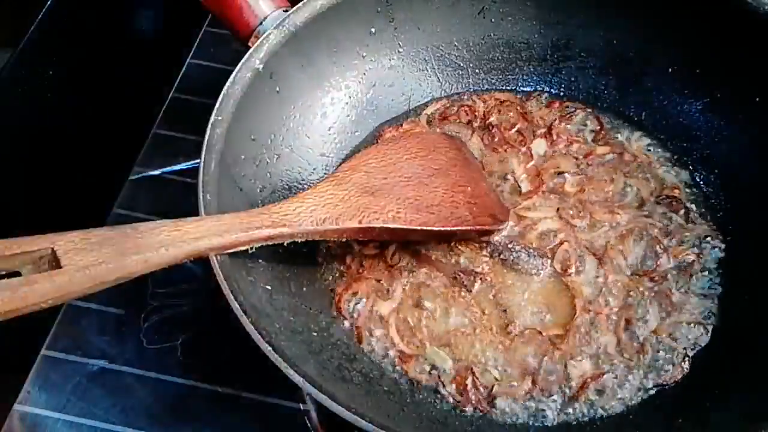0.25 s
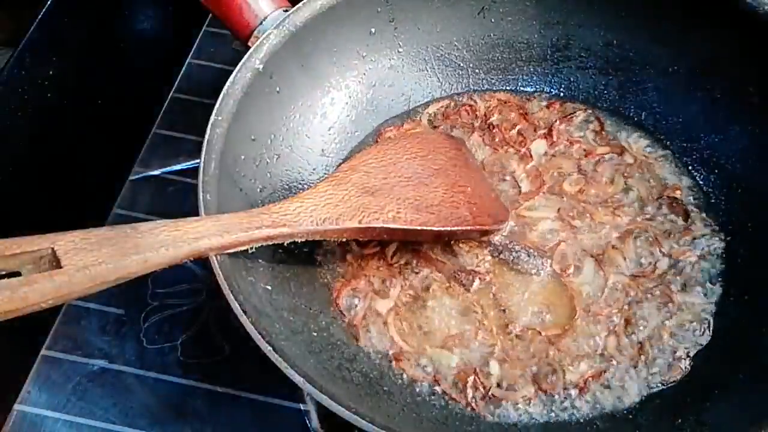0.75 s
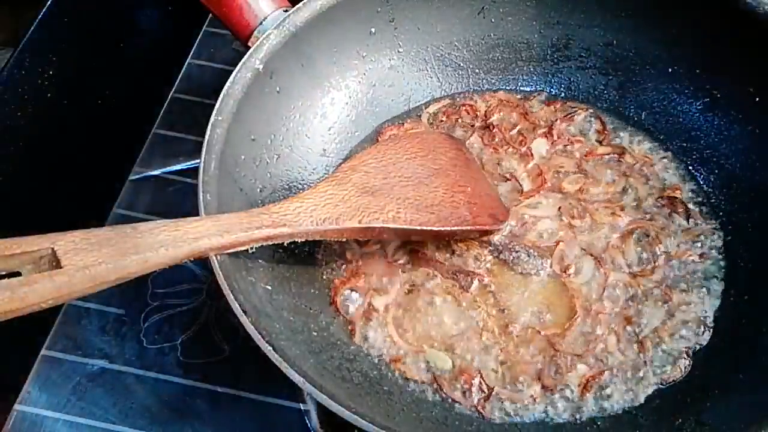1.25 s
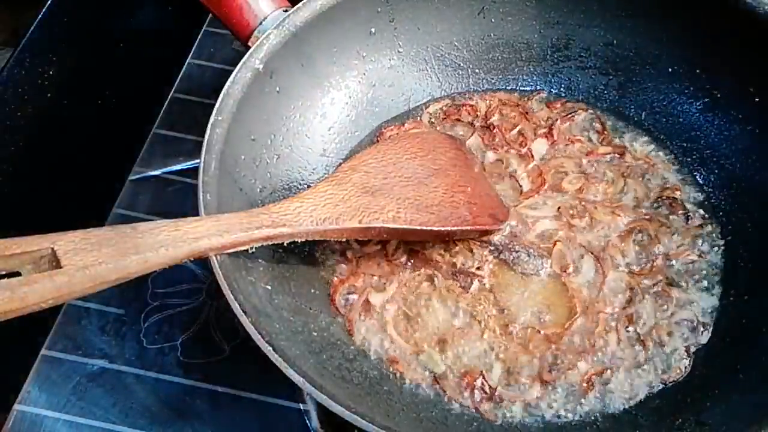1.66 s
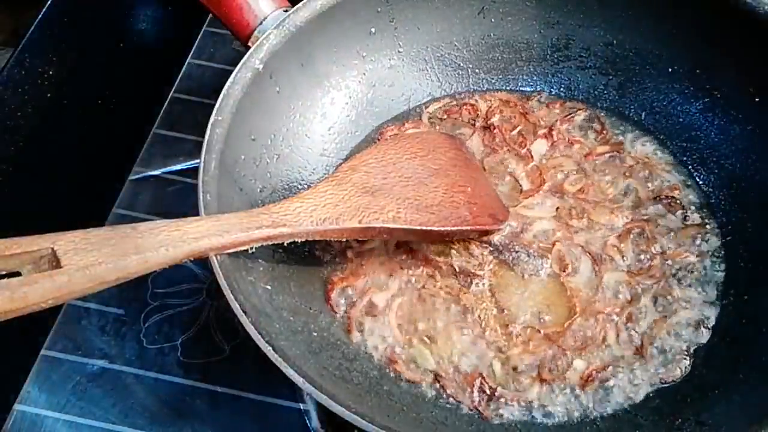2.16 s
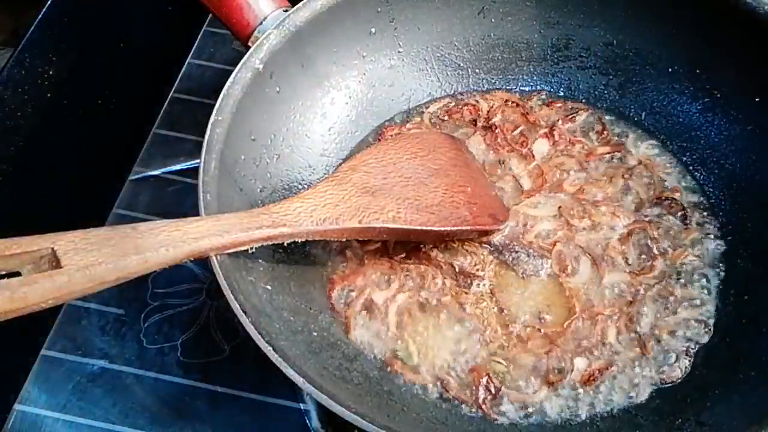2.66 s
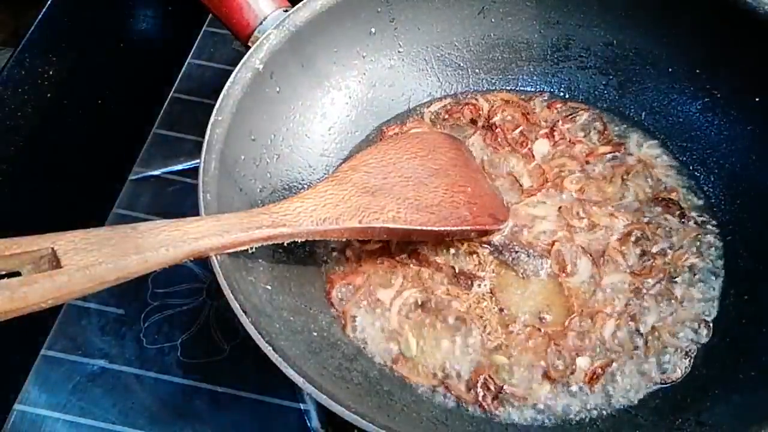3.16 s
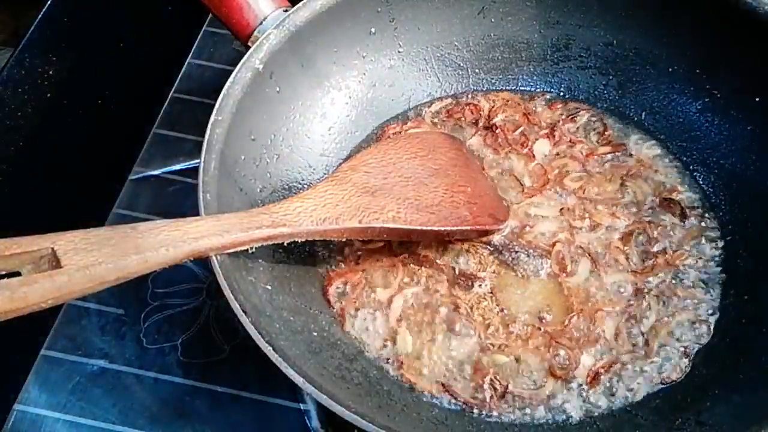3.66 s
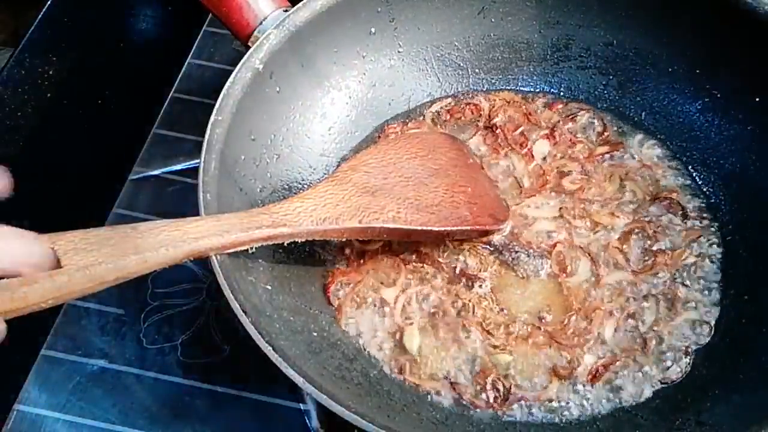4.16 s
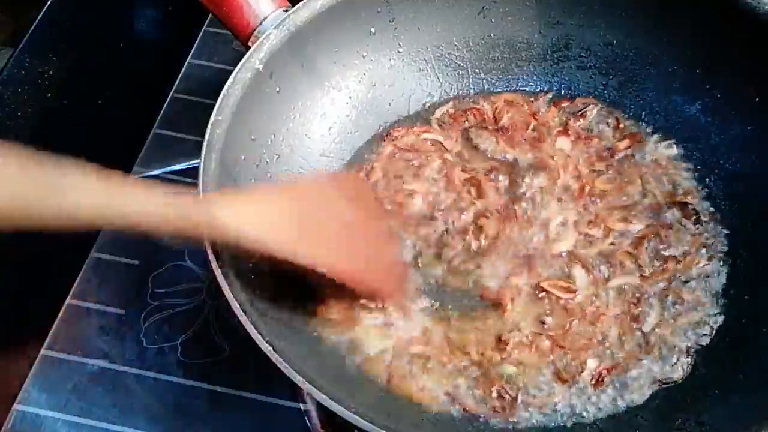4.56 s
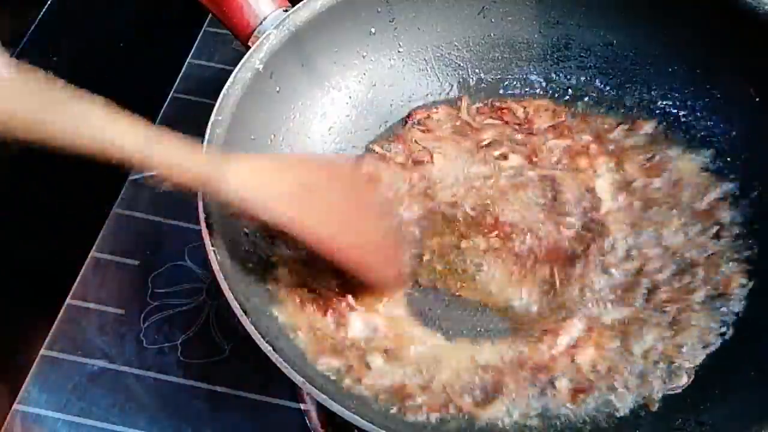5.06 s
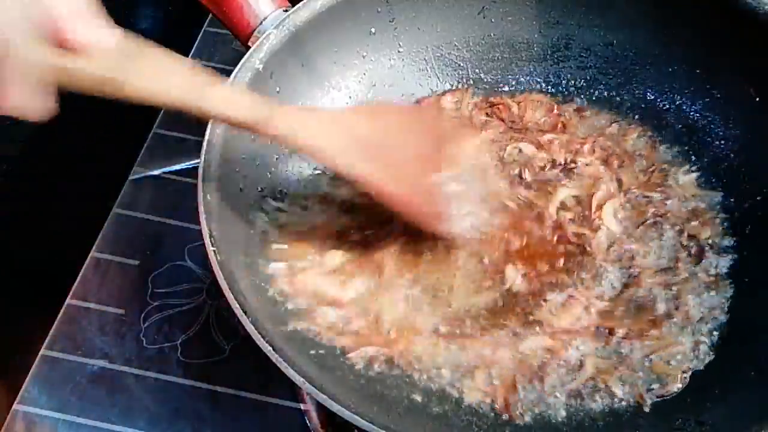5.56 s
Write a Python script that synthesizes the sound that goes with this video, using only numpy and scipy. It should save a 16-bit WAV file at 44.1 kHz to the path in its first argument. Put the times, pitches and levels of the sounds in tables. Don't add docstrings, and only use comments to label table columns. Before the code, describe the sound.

Dense, bright bubbling fizz over a faint low burner roar, one brief hollow bowl knock early, then stirring makes the boil louder and brighter.

```python
import sys
import numpy as np
from scipy import signal
from scipy.fft import rfft, irfft
from scipy.io import wavfile
from scipy.ndimage import uniform_filter1d

SR = 44100
rng = np.random.default_rng(int(sys.argv[2]) if len(sys.argv) > 2 else 0)


def wav_out(sig):
    wavfile.write(sys.argv[1], SR, np.round(np.clip(np.atleast_2d(sig).T, -1, 1) * 32767).astype(np.int16))


def volts_from_db(level):
    exponent = np.asarray(level, float) / 20
    return 10 ** exponent


N = 255956
PAN_LAG = 7
BOWL_LEAD = 6


def evened(x):
    return x / np.sqrt(np.mean(x ** 2) + 1e-20)


def read(points, hz):
    f, value = np.transpose(points)
    return np.interp(np.log(hz + 1), np.log(f + 1), value)


def curve(rows, index):
    rows = np.asarray(rows)
    return np.interp(np.arange(N) / SR, rows[:, 0], rows[:, index])


def add(mix, s, sound):
    part = mix[:, round(s * SR):][:, :sound.shape[1]]
    part += sound[:, :part.shape[1]]


def drift(top_hz):
    hz = np.fft.rfftfreq(N, 1 / SR)
    z = rfft(rng.standard_normal(N)) / np.sqrt(hz + .5)
    return evened(irfft(z * (hz < top_hz) * (hz > 2.5), N))


# frequency in [Hz], left minus right in [dB].
PORT_LEAN = [(60, .3), (200, .1), (400, -1), (1300, -.7), (2400, -2), (4400, -2), (8100, -.7),
             (15000, -4.3)]


def coloured(x, points):
    hz, z = np.fft.rfftfreq(N, 1 / SR), rfft(x, axis=1)
    flat = z / np.sqrt(uniform_filter1d(abs(z) ** 2, size=1500, axis=1) + 1e-12)
    lean = np.array([[.5], [-.5]]) * read(PORT_LEAN, hz)
    return evened(irfft(flat * volts_from_db(read(points, hz) + lean), N, axis=1))


def resonate(x, hz, width):
    turn = np.exp(2j * np.pi * np.cumsum(hz * np.ones(len(x))) / SR)
    r = np.exp(-np.pi * width / SR)
    return 2 * (turn * signal.lfilter([1 - r], [1, -r], x / turn)).real


def resonate_ports(pair, hz, *widths):
    for width in widths:
        pair = np.array([resonate(x, hz, width) for x in pair])
    return pair


def burst(hz, cycles, pan_db, wall_db, swell=.01):
    t = np.arange(500) / SR
    ring = np.sin(2 * np.pi * hz * t * (1 + 0.027 * hz * t))
    ring *= np.exp(-hz * t / cycles) * (hz * t < 12) * (1 - np.exp(-hz * t / swell))
    echoes = rng.standard_normal((2, 500)) * (rng.random((2, 500)) < .12)
    paths = volts_from_db(wall_db - 60 * t / 0.072) * echoes
    paths[0, PAN_LAG + rng.integers(-1, 3) + 3] += volts_from_db(pan_db / 2)
    paths[1, 3] += volts_from_db(-pan_db / 2)
    return signal.fftconvolve(ring[None] / abs(ring).max(), paths, axes=1)


def bubbles(lo_hz, hi_hz, per_s, spread_db, cycles, wall_db, clump_db, count):
    busy = volts_from_db(clump_db * drift(40))
    strength = volts_from_db(spread_db * np.minimum(rng.exponential(1, N), 3.3))
    strength = strength * (rng.random(N) < busy * per_s / SR)
    kind, out = rng.integers(0, count, N), np.zeros((2, N))
    for k, hz in enumerate(np.geomspace(lo_hz, hi_hz, count)):
        shape = burst(hz, cycles, rng.normal(-0.09, 11.4), wall_db)
        out += signal.oaconvolve((strength * (kind == k))[None], shape, axes=1)[:, :N]
    return evened(out)


def steam(same):
    a, b = rng.standard_normal((2, N))
    return np.array([same * np.roll(a, PAN_LAG) + np.sqrt(1 - same ** 2) * b, a])


def patchy(x):
    z = signal.stft(x, nperseg=256, noverlap=192)[2]
    field = uniform_filter1d(rng.standard_normal(z.shape[1:]), size=5, axis=0)
    field = uniform_filter1d(uniform_filter1d(field, size=10, axis=1), size=10, axis=1)
    return signal.istft(z * volts_from_db(1.2 * evened(field)), nperseg=256, noverlap=192)[1][:, :N]


# frequency in [Hz], density in [dB per Hz].
FIZZ_COLOUR = [(1180, -19), (2000, -1), (2110, -3), (2440, -4), (2750, -1.5), (3100, 0.5), (3340, -0.5),
               (5220, 0), (7230, -0.5), (8290, 3.5), (10000, -2), (15500, -17.5)]
# time in [s], level of the fizz in [dB].
BOIL = [(0, -41.5), (.49, -41.5), (.76, -42.5), (1.1, -40.5), (1.5, -41), (1.85, -40.5), (2.48, -40.5),
        (2.78, -39.5), (3.1, -41), (3.6, -40), (4.3, -40.5), (4.54, -39.5), (4.64, -38.5), (4.83, -37),
        (5.2, -34.5), (5.8, -35)]
CALM_DB = -41


def fizz():
    small = bubbles(2720, 13800, 2600, 2.04, 0.65, -13.0, 1.9, count=24)
    spits = bubbles(7400, 15000, 200, 3.2, 0.81, -25.0, 3.9, count=8)
    mixed = patchy(small + volts_from_db(-5.5) * spits + volts_from_db(4.0) * steam(0.0091))
    x = coloured(mixed, FIZZ_COLOUR) * volts_from_db(0.51 * drift(21))
    hz = np.fft.rfftfreq(N, 1 / SR)
    spray = irfft(rfft(x, axis=1) / (1 + (11000 / (hz + 1)) ** 8), N, axis=1)
    boil_db = curve(BOIL, index=1)
    spray_db = -50.5 + 1.65 * (boil_db - CALM_DB)
    sweep_s, sweep_length_s = 4.76, .09
    spray_db += 5.5 * np.exp(-((np.arange(N) / SR - sweep_s) / sweep_length_s) ** 2)
    return volts_from_db(boil_db + 2.0) * evened(x - spray) + volts_from_db(spray_db + 2.0) * evened(spray)


# frequency in [Hz], density in [dB per Hz].
BURBLE_COLOUR = [(260, -81), (450, -32), (502, -27), (599, -1), (645, -5.5), (694, -2.5), (850, -3.5),
                 (1050, -2.5), (1170, 3.5), (1220, 4), (1390, 0.5), (1500, 0.5), (1610, -5), (1790, -0.5),
                 (2600, -23.5), (3380, -3.5), (5720, -120)]


def burble():
    grains = bubbles(604.0, 2800, 500, 0.86, 2.85, 0.64, 2.3, count=16)
    sinks_db_per_s = 0.38
    db = -47.5 + 0.48 * (curve(BOIL, index=1) - CALM_DB) - sinks_db_per_s * np.arange(N) / SR
    return volts_from_db(db + 2.5) * coloured(patchy(grains + volts_from_db(11.0) * steam(0.061)), BURBLE_COLOUR)


# frequency in [Hz], density in [dB per Hz].
FLAME_COLOUR = [(8.8, -45), (15, -8), (37, -11), (64, -5.5), (97, 2), (167, -4.5), (203, -2.5), (233, -6.5),
                (378, -6.5), (467, -12), (504, -9), (560, -14), (730, -35), (1230, -120)]
# frequency in [Hz], left-right likeness in [0 to 1].
FLAME_SAME = [(60, 1), (100, 0.99), (160, 1), (270, 0.89), (450, 0.013)]


def flame():
    a, b = rfft(rng.standard_normal((2, N)), axis=1)
    same = np.clip(read(FLAME_SAME, np.fft.rfftfreq(N, 1 / SR)), -1, 1)
    x = irfft(np.array([a, same * a + np.sqrt(1 - same ** 2) * b]), N, axis=1)
    flame_db = -51
    return volts_from_db(flame_db + 0.6 + 1.44 * drift(12.0)) * coloured(x, FLAME_COLOUR)


# start in [s], peak in [dB], pitch in [Hz], left minus right in [dB].
SIMMER_POPS = [(0.031, -23, 7800, -2), (0.1341, -22, 8600, -4), (0.1938, -27, 7650, -4),
               (0.481, -18.5, 7880, 3.5), (0.723, -24, 7800, -6), (0.859, -23.5, 7660, -1),
               (1.004, -23.5, 8800, 2.5), (1.3006, -27, 7900, -1), (1.4168, -19, 7900, -6),
               (1.711, -21, 7390, -10), (1.8422, -17.5, 7850, -18), (1.911, -24.5, 8600, -8),
               (1.922, -23.5, 7930, -1.0), (1.9832, -25, 3960, -18), (2.304, -30, 8250, -6),
               (2.3472, -22, 7860, 0), (2.378, -33, 3160, -10), (2.384, -22.5, 7500, 1),
               (2.993, -28, 8500, -10), (3.116, -29, 7940, -3), (3.38, -24, 8260, -1),
               (3.6503, -21, 8200, -17), (3.697, -28.5, 5250, -7), (3.756, -22.5, 9500, -11),
               (3.9492, -21, 7770, -1.5), (3.9878, -26, 7960, -6), (4.103, -26, 9130, -7),
               (4.159, -32, 4900, -7), (4.293, -22, 7660, -8), (4.346, -22, 9100, -24)]
# start in [s], peak in [dB], pitch in [Hz], left minus right in [dB].
STIRRED_POPS = [(4.579, -22.5, 7000, 2), (4.5885, -34, 4640, -10), (4.6034, -25, 8420, -3),
                (4.623, -17, 8340, -3), (4.7047, -16, 9000, -19), (4.7176, -12.5, 8650, -11),
                (4.8873, -26, 7740, -5), (4.8984, -18, 8430, -2.0), (4.9124, -12, 7600, -2),
                (4.942, -14, 8900, -1), (4.9935, -29, 8490, -3), (5.163, -22, 7500, -7),
                (5.173, -24, 7360, 2), (5.281, -11, 7650, -2), (5.332, -24, 8450, -3),
                (5.367, -24, 8070, -3), (5.402, -13, 7750, 4), (5.4291, -32, 9350, -6),
                (5.589, -18, 7840, -3), (5.638, -20, 8800, -6), (5.6666, -19, 7730, 0)]
# start in [s], peak
# in [dB], pitch in [Hz], left minus right in [dB].
LESSER_POPS = [(0.126, -28, 6800, -5), (0.492, -25, 8300, 3), (0.497, -25, 7700, 4), (0.6153, -22, 7800, 1),
               (0.6797, -21, 8100, 4), (0.777, -25, 6700, 0), (0.8368, -35, 7500, -5),
               (0.9244, -25, 8400, -2), (1.4256, -34, 8500, 8), (1.4489, -24, 8500, 3),
               (1.552, -23, 7800, 2), (1.6026, -23, 7440, 2), (1.6656, -21, 8200, -9),
               (1.6992, -24, 7900, -3), (1.933, -19, 6900, -2), (1.9748, -23, 5600, -3),
               (2.108, -18, 8100, -8), (2.218, -23, 8200, -4), (2.356, -24, 8700, -5),
               (2.451, -19, 6360, -5), (2.5001, -37, 7600, -1), (2.8158, -34, 6400, -6),
               (2.952, -22.5, 6600, 0), (2.9943, -32, 7500, -5), (3.1146, -23, 6800, -3),
               (3.48, -33, 8000, -1), (3.537, -27, 5400, 1), (3.557, -26, 9300, -9),
               (3.7324, -16, 7200, -2), (3.8202, -25, 8600, -6), (3.8323, -31, 8400, -1),
               (3.982, -17, 6900, 0), (4.0052, -23, 8050, -6), (4.1586, -20, 9350, -3),
               (4.1778, -33, 6300, 0), (4.2816, -24, 7700, -8), (4.297, -17, 7660, -3),
               (4.5582, -27, 8300, -1), (4.591, -22, 4970, -13), (4.604, -27, 7400, -1),
               (4.6365, -16, 8000, 0), (4.7869, -15, 8700, -11), (5.1188, -33, 7750, -2),
               (5.163, -26, 7000, -8), (5.172, -16, 6860, -2), (5.2406, -28, 8400, -8),
               (5.4088, -25, 9000, -4), (5.429, -20, 6200, -5), (5.4769, -30, 8100, 1),
               (5.7412, -31, 7600, -10)]


def pops():
    lesser = [(s + .001, db - 6, hz, pan_db) for s, db, hz, pan_db in LESSER_POPS]
    stirred = [(s, db - 4.5, hz, pan_db) for s, db, hz, pan_db in STIRRED_POPS]
    out = np.zeros((2, N))
    for s, db, hz, pan_db in SIMMER_POPS + stirred + lesser:
        ring = burst(hz, 2.1, pan_db, -17.5, swell=.8)
        snap = burst(12400, 1.0, pan_db, -18.0)
        pop = ring + volts_from_db(-12) * snap
        add(out, s + 0.0007, volts_from_db(db - 0.5) * pop / abs(pop.mean(0)).max())
    return out


# start in [s], peak in [dB], left minus
# right in [dB].
TICKS = [(0.0638, -34, -4.0), (0.4823, -34, -0.5), (0.7542, -37, -1.0), (0.9248, -37, -4.0),
         (0.9797, -38, -3.0), (1.0036, -35, -2.5),
         (1.2998, -36, -5.0), (1.3742, -40, -5.0), (1.4166, -34, -5.0), (1.666, -36, -6.5),
              (1.7014, -34, -4.5), (1.8421, -33, -7.0), (1.9114, -35, -7.0), (2.3569, -35, -6.0),
              (2.4158, -37, -4.5), (2.6488, -36, -4.5), (2.7256, -38, -4.5), (2.8807, -40, -5.5),
              (2.964, -34, -7.0), (2.994, -33, -7.0), (3.1222, -33, -3.5), (3.2609, -37, -1.0),
              (3.3791, -34, -2.0), (3.5572, -33, -4.0), (3.65, -28, -7.5), (3.6969, -34, -6.5),
              (3.7557, -29, -7.0), (3.884, -35, -5.0), (3.9493, -35, -7.0), (3.9817, -33, -7.0),
              (4.103, -33, -4.5), (4.1598, -31, -5.0), (4.3454, -30, -8.0), (4.4028, -36, -6.0),
              (4.7046, -26, -9.5), (4.9964, -27, -1.5)]


def ticks():
    out = np.zeros((2, N))
    for s, db, pan_db in TICKS:
        tick = burst(12500, 1.0, pan_db, -20.0, swell=.3)
        add(out, s + 0.00046, volts_from_db(db + 3) * tick / abs(tick.mean(0)).max())
    return out


# start in [s], rise in [s], rub in [dB], fade in [dB per s].
SLIDES = [
    (0.734, 0.0033, -32.5, 220),
    (.752, 0.017, -38, 250),
    (.8, 0.013, -43, 150),
    (.86, 0.057, -29.5, 138),
    (1.014, 0.0055, -30, 20),
    (1.077, .004, -25, 3),
    (1.128, 0.0054, -20, 150),
    (1.17, 0.0025, -28.5, 100),
    (1.243, .005, -38, 130),
]


def slide_db(t):
    rows = np.array(SLIDES)
    start, rise, db, fade = rows[np.maximum(np.searchsorted(rows[:, 0], t) - 1, 0)].T
    late = t - start - rise
    return db + np.where(late < 0, 15 * late / rise, -fade * late)


def rung(push, modes):
    x = 0
    for hz, db, t60 in modes:
        x = x + volts_from_db(db) * resonate_ports(push, hz, np.log(1000) / np.pi / t60)
    return x / abs(x).max()


# time in [s], pitch in [Hz].
HOLLOW = [(.737, 1270), (.7405, 890), (.75, 1290), (.765, 1460), (.885, 1600), (1.0, 1600), (1.022, 1370),
          (1.08, 1230), (1.13, 1035), (1.16, 930), (1.23, 930), (1.28, 970), (1.34, 860)]
# frequency in [Hz], level in [dB], decay time t60 in [s].
WALL = [(930, -18, 0.097), (1315, 1, 0.053), (1575, 2.5, 0.034), (2515, 2, 0.069), (2850, -4.5, 0.025)]


def slide():
    t = np.arange(N) / SR
    on = np.clip((1.4 - t) / 0.06, 0, 1)
    grit = rng.standard_normal((2, N)) * volts_from_db(2.1 * drift(190))
    grit[0] = .45 * grit[0] + .65 * np.roll(grit[1], -BOWL_LEAD)
    hz, stroke_db = curve(HOLLOW, index=1), slide_db(t)
    rub = evened(resonate_ports(grit, hz, 270, 460))
    grain = evened(resonate_ports(grit, 1.23 * hz, 800))
    wall = evened(rung(grit, WALL))
    out = volts_from_db(stroke_db - 6.0) * on * (rub + volts_from_db(-2.0) * grain + volts_from_db(-7) * wall)
    rattle = evened(resonate_ports(grit, 7800, 5000, 5000))
    return out + volts_from_db(-13 - 25.0 + 1.6 * (stroke_db + 27.0)) * on * rattle


# start in [s], peak in [dB], hardness in [dB], left minus right in [dB].
SCUFFS = [
    (0.7361, -30, 7, 6),
    (0.7405, -25, -4, 6),
    (.883, -30.5, 3, 2),
    (0.905, -30, -3, 2),
    (0.9162, -21.5, -24, -10),
    (0.959, -32, -14, -4),
    (1.041, -27, -6, -1),
    (1.055, -30, -18, -4),
]
# start in [s], peak in [dB], hardness in [dB], left minus right in [dB].
ROCKS = [(1.0215, -33, -1, 0), (1.026, -22, -14, 2), (1.0815, -14, -12, -1), (1.107, -13, -11, -2),
         (1.1105, -23, -5, -3), (1.121, -20, -14, -3), (1.130, -11, -19, -3), (1.1332, -9.5, -16, -4),
         (1.1372, -19, -2, -3), (1.1435, -25, -9, -3), (1.172, -17, -14, -3), (1.248, -31, -9, -2.5)]
# frequency in [Hz], level in [dB], decay time t60 in [s].
CLACK = [(1600, 2, 0.011), (2250, -19, .005), (2500, 28, 0.0052), (3400, 19, 0.005), (4280, 13, 0.0059)]
# frequency in [Hz], level in [dB], decay time t60 in [s].
RIM = [(3570, -7.5, 0.0033), (4870, -8, 0.047), (5390, -7, .02), (5800, -3, 0.027), (7020, -10, 0.016),
       (7600, -7, 0.02), (7770, -12, 0.036), (9500, -3, 0.028), (10700, -3.5, 0.018)]


def blows():
    out, hollow_curve = np.zeros((2, N)), curve(HOLLOW, index=1)
    u = np.arange(2000) / SR
    contact = (u / .0009) * np.exp(-u / 0.00074)
    hits = [(*row, -19) for row in SCUFFS] + [(*row, 4.5) for row in ROCKS]
    for s, db, hard_db, pan_db, rim_db in hits:
        hz = hollow_curve[round(s * SR)]
        push = rng.standard_normal((2, 2000)) * contact
        push[0] = .55 * push[0] + .7 * np.roll(push[1], -BOWL_LEAD)
        squeeze = contact * np.sin(2 * np.pi * hz * u - [[.7], [0]]) + 0.18 * push
        hollow = resonate_ports(squeeze, hz, 600, 950)
        blow = hollow / abs(hollow.mean(0)).max()
        blow = blow + volts_from_db(hard_db + 1.5) * rung(push, CLACK)
        blow = blow + volts_from_db(hard_db + rim_db + 12.5) * rung(push, RIM)
        blow = blow + volts_from_db(-4.5) * rung(push, WALL)
        add(out, s, volts_from_db(db + np.array([[.5], [-.5]]) * pan_db) * blow)
    return out


def bowl():
    band = signal.butter(4, [680, 13000], "band", fs=SR, output="sos")
    return signal.sosfilt(band, slide() + blows())


# frequency in [Hz], decay time t60 in [s].
KITCHEN = [(500, 0.1), (1000, 0.16), (3000, 0.32), (6000, 0.35), (11000, 0.37)]


def kitchen(x):
    taps = np.zeros((2, SR // 2))
    at = np.arange(200, SR // 2 - 20, 20) + rng.integers(0, 20, (2, (SR // 2 - 201) // 20))
    np.put_along_axis(taps, at, rng.choice([-1., 1.], at.shape), 1)
    hz, t, z = signal.stft(taps, SR, nperseg=256)
    tail = signal.istft(z * volts_from_db(-60 * t / read(KITCHEN, hz)[:, None]), SR, nperseg=256)[1]
    return signal.fftconvolve(x.mean(0)[None], tail / np.linalg.norm(tail[0]), axes=1)[:, :N]


# start in [s], length in [s], scrape in [dB], first pitch in [Hz], last pitch in [Hz].
STIRS = [
    (4.55, 0.17, -37, 1290, 1560),
    (4.8, 0.22, -41, 1450, 1550),
    (4.978, 0.19, -34, 1600, 1710),
    (5.12, 0.073, -32, 1410, 1230),
]


def spoon():
    out, rough = np.zeros((2, N)), steam(0.99) * volts_from_db(2.2 * drift(90))
    for s, length, db, first_hz, last_hz in STIRS:
        u = np.arange(0, length, 1 / SR) / length
        hz = first_hz + (last_hz - first_hz) * u
        press = np.interp(u, [0, 0.57, 1], [0, 1, 0])
        rub = resonate_ports(rough[:, round(s * SR):][:, :len(u)], hz, 450, 600)
        add(out, s, volts_from_db(db - 8.0) * press * evened(rub))
    return out


def scene():
    knock, single = bowl(), pops()
    room = kitchen(volts_from_db(-8.5) * knock + volts_from_db(-8) * single)
    room[0] = 2.56 * room[0] + 1.14 * room[1]
    return fizz() + burble() + flame() + spoon() + single + knock + room + ticks()


def low_pass(x):
    return signal.sosfilt(signal.butter(12, 16830, fs=SR, output="sos"), x)


def record(dry):
    edge_hz = 15790
    narrow = irfft(rfft(dry, axis=1) * (np.fft.rfftfreq(N, 1 / SR) < edge_hz), N, axis=1)
    return low_pass(narrow)


dry = scene()
out = record(dry)
wav_out(out)
```